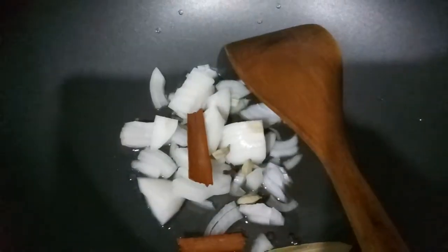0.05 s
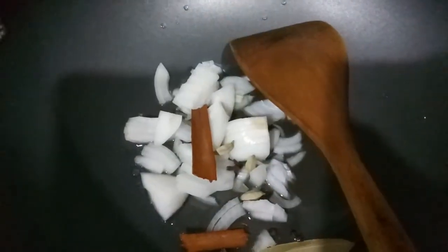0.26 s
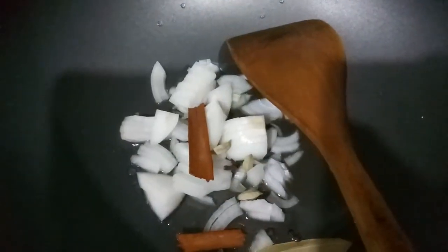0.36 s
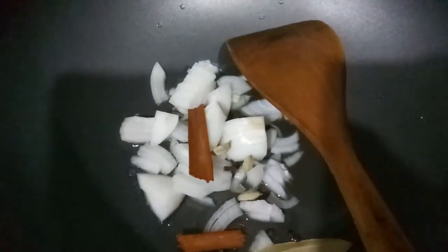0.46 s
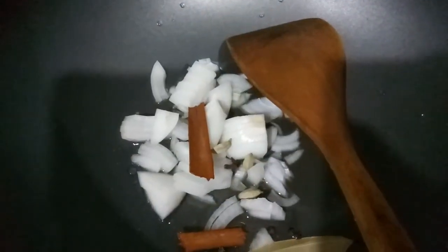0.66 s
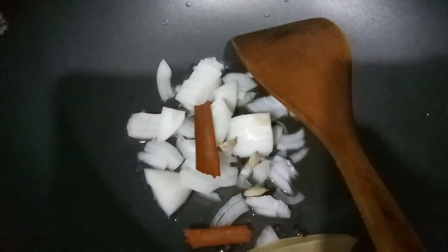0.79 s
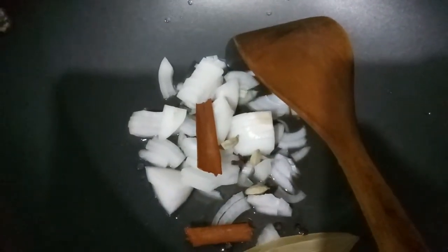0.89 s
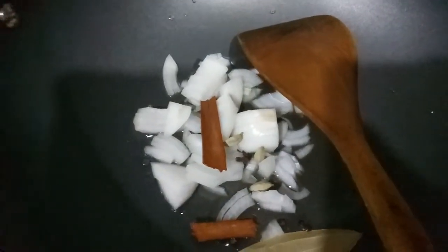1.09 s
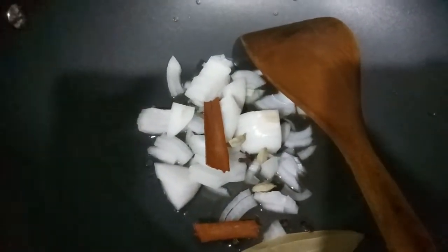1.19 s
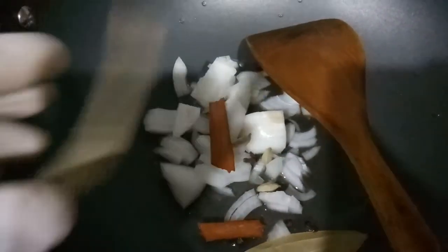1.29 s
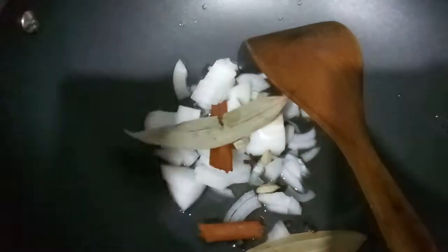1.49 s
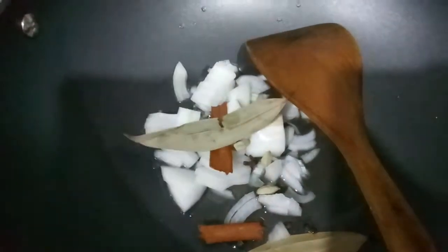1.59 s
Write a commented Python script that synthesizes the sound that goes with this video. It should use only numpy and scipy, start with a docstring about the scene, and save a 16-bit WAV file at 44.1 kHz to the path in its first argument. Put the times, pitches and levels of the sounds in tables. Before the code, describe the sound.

Close, overloud double clack of a ceramic bowl on a hard surface with a short bright room tail, then soft crackles of a dry leaf in fingers and its tiny landing in a pan, above faint hiss and hum.

```python
"""Bowl knocks and a bay leaf in a kitchen

A ceramic spice bowl knocks twice on a hard surface, close to the microphone: damped sine modes ring over
thuds of shaped noise, and a bare kitchen answers with decaying noise and lingering lines.
A dry bay leaf rustles in the fingers as random grains, then drops into a pan of onions as short noise bursts.
Filtered noise makes the stove's quiet hiss and hum. A limiter ducks and recovers, which holds the tail up.
"""
import sys
import numpy as np
from scipy import signal
from scipy.fft import rfft, irfft
from scipy.io import wavfile
from scipy.ndimage import uniform_filter1d, minimum_filter1d

SR = 44100
rng = np.random.default_rng(int(sys.argv[2]) if len(sys.argv) > 2 else 0)


def generate_wav(sig):
    """Save sig (samples, or channels by samples) to the path in sys.argv[1] as 16-bit PCM at SR."""
    pcm = np.round(np.clip(np.atleast_2d(sig).T, -1, 1) * 32767).astype(np.int16)
    wavfile.write(sys.argv[1], SR, pcm)


N = 72765
TIME = np.arange(N) / SR  # s
BINS = np.maximum(np.fft.rfftfreq(N, 1 / SR), 1)  # Hz

# bowl contacts, a graze and two knocks that each rebound:
# start_s, thud_db, low_ring_db, high_ring_db, high_ring_left_right_db
KNOCKS = [(.2232, -58.5, -59, -36, -11), (.2347, 11.5, 5, 4.5, -18.5), (.2418, -7, 12.5, 6, 6.5),
          (.3505, 4.5, 8.5, -10, 9.5), (.3603, -7, 3.5, -13.5, 13.5)]
# modes of the bowl and the surface it meets: pitch_hz
MODE_HZ = [230, 528, 1296, 1446, 1702, 1879, 2287, 2860, 3601, 3810, 3919, 6948, 6982, 10360, 13900]
# strength and damping of each mode: relative_db, t60_s, left_right_db, lingering_relative_db, lingering_width_hz
MODES = [(-28.5, 0.27, 4.5, -13, 34), (-30, 0.17, 6, -14.5, 14), (-9.5, 0.019, 11.5, -23.5, 88),
         (-11.5, 0.013, 11, -20.5, 45), (-15.5, 0.1, 16, -18.5, 35), (-22.5, 0.061, 14, -18.5, 25),
         (-21.5, 0.15, 4.5, -19, 25), (-26, 0.062, 10, -21, 11), (-31, 0.055, 15, -21.5, 39),
         (0, 0.042, 23, -22, 42), (-13.5, 0.041, 6, -14, 32), (-7, .07, -8, -23.5, 11),
         (-12.5, 0.16, 2.5, -18.5, 39), (-42.5, 0.14, 1, -11.5, 58), (-42, .06, 15, -12.5, 400)]
HIGH_RING_HZ = 5000
RING_BUILD_S, CONTACT_S = 0.0023, 0.00074  # onsets of the low ring, and of the high ring and thud
# the linger's decay, its share of the mode's left-right dB, and the share of its power in a clean tone
LINGER_T60_S, LINGER_PAN_SHARE, LINGER_STEADY = 0.51, 0.66, 0.3
# dense, quickly damped thud of the surface: pitch_hz, relative_db
THUD_SPECTRUM = [(40, -23.5), (130, -24.5), (235, -21.5), (340, -10), (700, -11.5), (1000, -7.5),
                 (1300, -2), (1800, -1.5), (2600, -8), (3300, -12.5), (4200, -13), (5500, -35), (7000, -19),
                 (9000, -47), (15000, -60)]
THUD_T60_S, THUD_PAN_DB = 0.046, 5
# the kitchen's answer to a knock: pitch_hz, relative_db
ECHO_SPECTRUM = [(40, -45.5), (95, -4.5), (160, -12), (230, -26.5), (290, -5.5), (480, -8), (650, -6.5),
                 (950, -2), (1300, 1), (2100, 0.5), (3200, -5), (3750, 8), (4150, -2), (4800, -14),
                 (5600, -34.5), (6300, -17), (6950, -5.5), (7600, -35), (9000, -60), (13500, -35),
                 (15500, -59)]
ECHO_DB, ECHO_PAN_DB, ECHO_BUILD_S = -15.5, 7, 0.0027
# reverberation time of the kitchen: pitch_hz, t60_s
ROOM_T60 = [(100, 0.79), (400, 0.55), (1500, 0.54), (4000, 0.46), (8000, 0.38), (15000, 0.15)]

# low bumps through the worktop, from the bowl's weight and from handling: start_s, level_db, left_right_db
BUMPS = [(.11, -53, 7), (.2347, -4, -2.5), (.645, -46.5, 2), (.715, -53.5, -10), (.765, -50, -4),
         (.84, -53.5, -9)]
# colour of the bumps: pitch_hz, relative_db
BUMP_SPECTRUM = [(30, -7), (75, 1.5), (130, -2), (220, 3), (400, -14), (1500, -56.5), (6000, -73)]
BUMP_T60_S = 0.077

# the leaf crackles in the fingers: start_s, level_db, left_right_db
CRACKLES = [(.866, -43, -1.5), (.9485, -46.5, -13), (.956, -44, 9), (.9638, -32, 2), (.972, -40, -10),
            (.979, -36, 4), (.985, -37, 6), (1.0135, -48, -9.5), (1.022, -44.5, 15), (1.078, -47, 8),
            (1.177, -48, 1)]
# colour of the crackles and the rustle: pitch_hz, relative_db
CRACKLE_SPECTRUM = [(200, -48.5), (1100, -40), (1500, -19.5), (1950, 6), (3000, 1), (4300, 5.5), (5500, -4),
                    (7000, 1), (9500, -19.5), (15000, -19)]
CRACKLE_T60_S, CRACKLE_ROOM_DB = 0.026, -18
# the leaf lands and settles: start_s, level_db, left_right_db
TAPS = [(1.4854, -25, 2), (1.4925, -37.5, -2.5), (1.502, -28, 16), (1.505, -31, 12), (1.5072, -21, 3),
        (1.510, -32, 1), (1.515, -33.5, 21.5), (1.5195, -36.5, 6), (1.5265, -37.5, -13), (1.538, -38, 4),
        (1.552, -43, 5)]
# colour of the landing: pitch_hz, relative_db
TAP_SPECTRUM = [(40, -53), (200, -18.5), (600, -18), (1000, -16.5), (1400, -7.5), (2000, -6), (2800, 0),
                (4300, 5.5), (5600, -9.5), (7000, -2), (9500, -22), (15000, -23)]
TAP_T60_S, TAP_ROOM_DB = 0.019, -27
# fine rustle of the leaf being picked up: time_s, level_db
RUSTLE_LEVEL = [(0, -77), (.8, -63), (.87, -59), (.93, -57.5), (.985, -51.5), (1.05, -55), (1.14, -65),
                (1.27, -62.5), (1.34, -52.5), (1.39, -57), (1.45, -69), (1.65, -90)]
GRAINS_PER_S, GRAIN_SPREAD_DB = 5100, 4

# the stove's steady hiss: pitch_hz, relative_db
HISS_SPECTRUM = [(25, -8.5), (60, 2), (140, 10), (250, 3.5), (330, 14), (500, -1), (1100, -2.5), (2200, -4),
                 (3300, 3), (4400, 6.5), (5400, -9.5), (6400, 6.5), (8000, -11.5), (10000, -15),
                 (13000, -33), (15200, -1.5)]
HISS_DB, HISS_PAN_DB = -60, 1.5
# steady resonances of the stove: pitch_hz, width_hz, level_db, left_right_db
STOVE_TONES = [(95.1, 6.8, -62, 3.5), (373, 44, -65, 4), (760, 93, -74.5, 4), (1376, 120, -70.5, 5),
               (2780, 110, -69, 11.5), (3940, 170, -71.5, 24), (4524, 170, -60, 10)]
# faint hums that swell and fade: start_s, end_s, pitch_hz, width_hz, peak_db, left_right_db
SWELLS = [(1.02, 1.149, 332, 5.5, -56.5, 8), (0.45, 1.1, 1400, 130, -62, 12),
          (1.124, 1.41, 1350, 60, -64, 9.5), (0.025, 0.21, 355, 36, -57.5, 7.5),
          (1.53, 1.66, 890, 240, -64.5, 7)]

# likeness of the two channels in noise, before the left lag: pitch_hz, correlation
LIKENESS = [(40, .15), (120, 0.96), (300, 1), (1000, 0.17), (3000, 0.1), (15000, 0.067)]
LEFT_LAG_S = 0.00046
LIMIT_DB, RECOVER_DB_PER_S, LOOKAHEAD_S = 3.5, 68, 0.0013
CUTOFF_HZ = 15600


def bowl():
    """Impact excitation: every contact thuds, rings the bowl's modes and fills the room."""
    thuds = [(s, thud_db, THUD_PAN_DB) for s, thud_db, *_ in KNOCKS]
    thud = bursts(thuds, THUD_SPECTRUM, THUD_T60_S, CONTACT_S)
    modes = ring()
    echo = kitchen([row[:2] for row in KNOCKS], ECHO_SPECTRUM)
    return modes + thud + from_db(ECHO_DB) * pan(ECHO_PAN_DB) * echo


def ring():
    """Modal synthesis: damped sines; scattered by the room, each lingers as a fluttering line."""
    low = [(s, from_db(db) * rise(s, RING_BUILD_S)) for s, _, db, _, _ in KNOCKS]
    high = [(s, from_db(db) * pan(side) * rise(s, CONTACT_S)) for s, _, _, db, side in KNOCKS]
    low_tail, high_tail = linger(low), linger(high)
    out = 0
    for hz, (db, t60, side, late_db, width) in zip(MODE_HZ, MODES):
        strokes, tail = (high, high_tail) if hz > HIGH_RING_HZ else (low, low_tail)
        direct = sum(strength * decay(s, t60) * tone(hz, s) for s, strength in strokes)
        clean = np.sqrt(2 * LINGER_STEADY) * tone(hz, rng.random())  # random phase
        line = clean + np.sqrt(1 - LINGER_STEADY) * resonance(hz, width)
        late = pan(side * LINGER_PAN_SHARE) * from_db(late_db) * tail * line
        out = out + from_db(db) * (pan(side) * direct + late)
    return out


def linger(strokes):
    """Energy addition: the decaying powers of all strokes sum into one envelope."""
    return np.sqrt(sum((strength * decay(s, LINGER_T60_S)) ** 2 for s, strength in strokes))


def bumps():
    """Structure-borne sound: impacts through the worktop arrive as low, damped bursts."""
    return bursts(BUMPS, BUMP_SPECTRUM, BUMP_T60_S, attack_s=0.0027)


def leaf(hits, spectrum, t60, room_db):
    """Brittle snapping: short broadband bursts of the dry leaf with a faint room tail."""
    snaps = bursts(hits, spectrum, t60, attack_s=0.00038)
    room = kitchen([row[:2] for row in hits], spectrum)
    return snaps + from_db(room_db) * pan(db=8.5) * room


def rustle():
    """Granular friction: tiny random grains of the leaf between the fingers sum in power."""
    struck = rng.random(N) < GRAINS_PER_S / SR
    grains = struck * from_db(GRAIN_SPREAD_DB * np.minimum(rng.exponential(1, N), 4))
    power = signal.fftconvolve(grains ** 2, decay(0, t60=0.021) ** 2)[:N]
    power = np.maximum(power, 0)
    level_db = np.interp(TIME, *np.transpose(RUSTLE_LEVEL))
    return from_db(level_db) * pan(db=2.0) * np.sqrt(power / power.mean()) * coloured(CRACKLE_SPECTRUM)


def kitchen(hits, spectrum):
    """Diffuse reverberation: each hit (s, dB) builds up quickly, then dies at its octave's own rate."""
    source = rfft(coloured(spectrum))
    octave = np.clip(np.log2(BINS / 125), 0, 7)
    out = 0
    for k in range(8):
        t60 = at_hz(ROOM_T60, 125 * 2 ** k)
        power = 0
        for s, db in hits:
            build = 1 - np.exp(-np.maximum(TIME - s, 0) / ECHO_BUILD_S)
            power = power + (from_db(db) * decay(s, t60)) ** 2 * build
        band = np.maximum(1 - abs(octave - k), 0)  # neighbouring bands crossfade
        out = out + np.sqrt(power) * irfft(source * band, N)
    return out


def stove():
    """Filtered noise: soft hiss, a low hum and breathy resonances, some of which come and go."""
    out = from_db(HISS_DB) * pan(HISS_PAN_DB) * coloured(HISS_SPECTRUM)
    for hz, width, db, side in STOVE_TONES:
        out = out + from_db(db) * pan(side) * resonance(hz, width)
    for start, end, hz, width, db, side in SWELLS:
        part = np.clip((TIME - start) / (end - start), 0, 1)
        swell = 2 * np.sqrt(part * (1 - part))
        out = out + from_db(db) * pan(side) * swell * resonance(hz, width)
    return out


def bursts(hits, spectrum, t60, attack_s):
    """High modal density: each hit (s, dB, left-right dB) excites short-lived modes heard as noise."""
    power = 0
    for s, db, side in hits:
        power = power + (from_db(db) * pan(side) * rise(s, attack_s) * decay(s, t60)) ** 2
    return coloured(spectrum) * np.sqrt(power)


def noise(gains):
    """Partial coherence: stereo noise of rms 1, alike as LIKENESS sets and later on the left."""
    mid, side = rfft(rng.standard_normal((2, N)))
    alike = np.clip(at_hz(LIKENESS, BINS), -1, 1)
    pair = np.sqrt(1 + alike) * mid + np.sqrt(1 - alike) * side * [[1], [-1]]
    lag = np.exp(-2j * np.pi * BINS * np.array([[LEFT_LAG_S], [0]]))
    x = irfft(gains * lag * pair, N)
    return x / np.sqrt(np.mean(x ** 2, axis=1, keepdims=True))


def coloured(spectrum):
    """Spectral shaping: noise of rms 1 that follows a spectrum table."""
    return noise(from_db(at_hz(spectrum, BINS)))


def resonance(hz, width):
    """Resonance: noise of rms 1 gathered around one frequency."""
    return noise(1 / (1 + ((BINS - hz) / width) ** 2 * 2))


def tone(hz, s):
    """Simple harmonic motion: a sine that starts its cycle at s, later on the left."""
    return np.sin(2 * np.pi * hz * (TIME - s - np.array([[LEFT_LAG_S], [0]])))


def decay(s, t60):
    """Exponential damping: jumps to 1 at s, then falls 60 dB in each t60."""
    return (TIME >= s) * np.exp(-np.log(1000) * np.clip((TIME - s) / t60, 0, 10))


def rise(s, length):
    """Finite contact time: a smooth onset from 0 at s to 1."""
    return 1 - np.exp(-np.clip((TIME - s) / length, 0, 10) ** 2)


def from_db(db):
    """Logarithmic level: decibels to amplitude gain."""
    return 10 ** (np.asarray(db) / 20)


def pan(db):
    """Interchannel level difference: left and right gains for a difference in dB."""
    return from_db([[db / 2], [-db / 2]])


def at_hz(points, hz):
    """Logarithmic pitch: interpolate a table along a log-frequency axis."""
    f, value = np.transpose(points)
    return np.interp(np.log(hz), np.log(f), value)


def scene():
    """Superposition: bowl, handling, leaf and stove add."""
    out = bowl() + bumps() + rustle() + stove()
    out = out + leaf(CRACKLES, CRACKLE_SPECTRUM, CRACKLE_T60_S, CRACKLE_ROOM_DB)
    return out + leaf(TAPS, TAP_SPECTRUM, TAP_T60_S, TAP_ROOM_DB)


def record(dry):
    """Peak limiting: gain ducks just ahead of peaks and recovers steadily; overshoot clips, the top is cut."""
    span = max(int(LOOKAHEAD_S * SR), 1)
    level_db = 20 * np.log10(abs(dry).max(axis=0) + 1e-9)
    over_db = np.maximum(level_db - LIMIT_DB, 0)
    over_db = -minimum_filter1d(-over_db, span)  # running maximum
    recovery_db = RECOVER_DB_PER_S * TIME
    duck_db = np.maximum.accumulate(over_db + recovery_db) - recovery_db
    clipped = np.clip(dry * from_db(-uniform_filter1d(duck_db, span)), -1, 1)
    lowpass = signal.ellip(10, 0.1, 80, CUTOFF_HZ, fs=SR, output="sos")  # order, ripple dB, stopband dB
    return signal.sosfilt(lowpass, clipped)


dry = scene()
out = record(dry)
generate_wav(out)
```